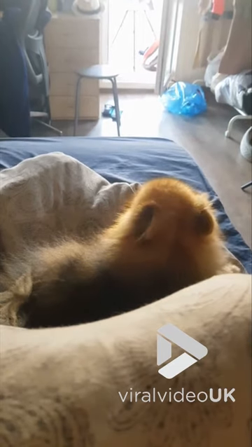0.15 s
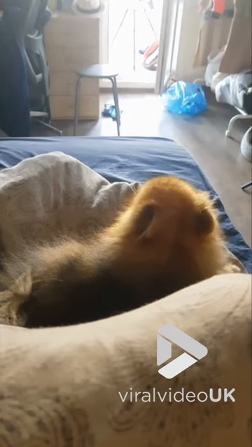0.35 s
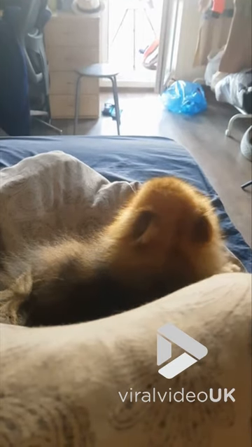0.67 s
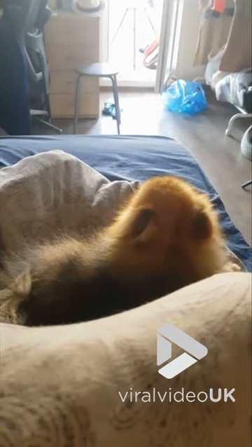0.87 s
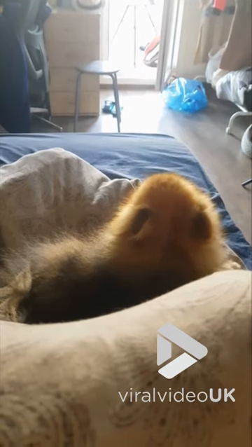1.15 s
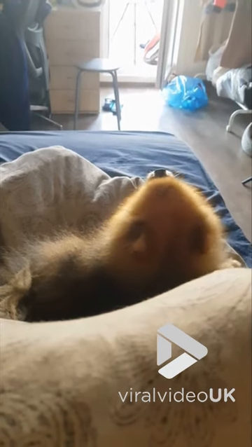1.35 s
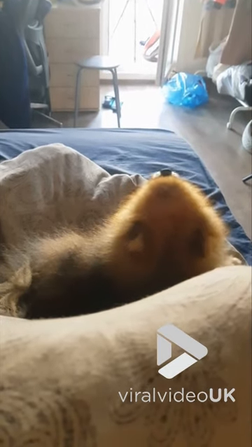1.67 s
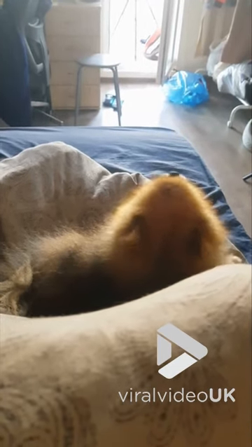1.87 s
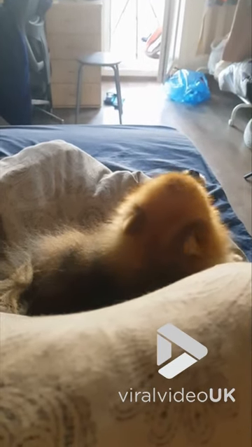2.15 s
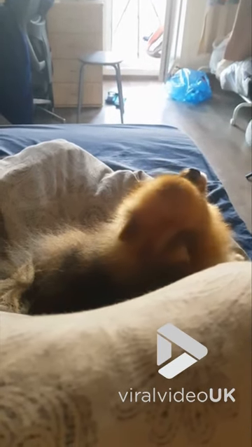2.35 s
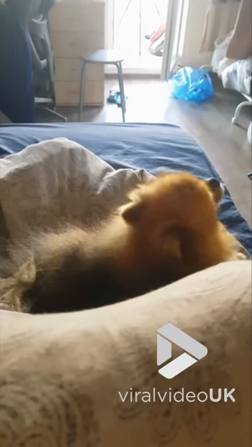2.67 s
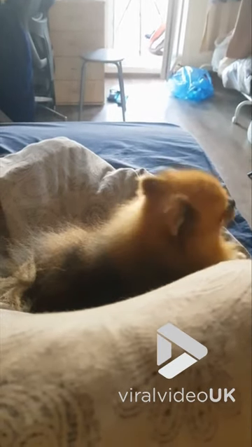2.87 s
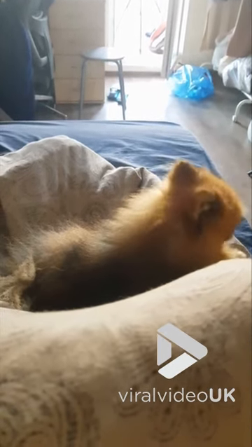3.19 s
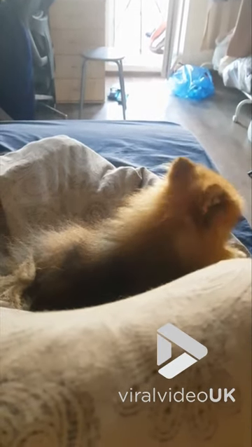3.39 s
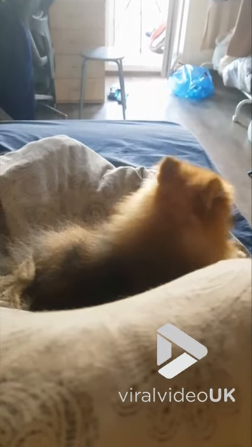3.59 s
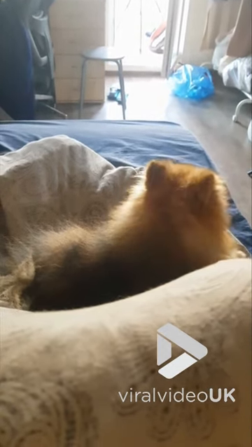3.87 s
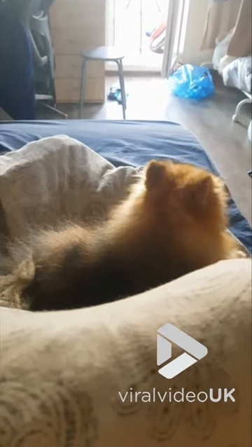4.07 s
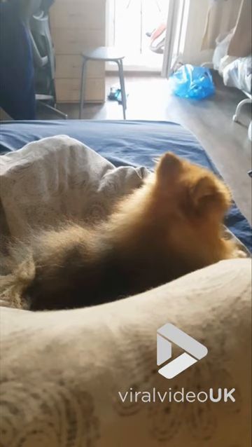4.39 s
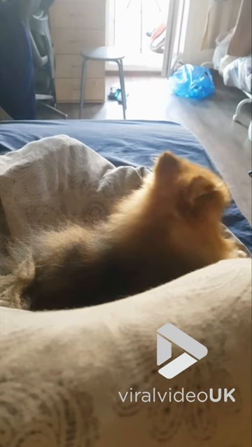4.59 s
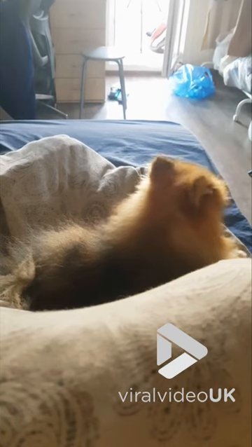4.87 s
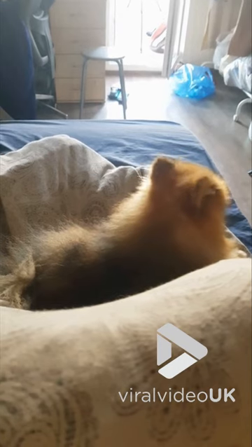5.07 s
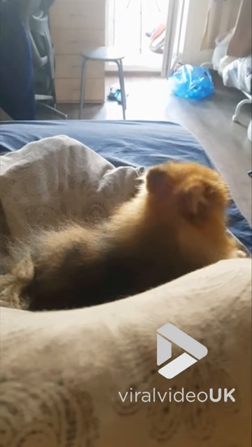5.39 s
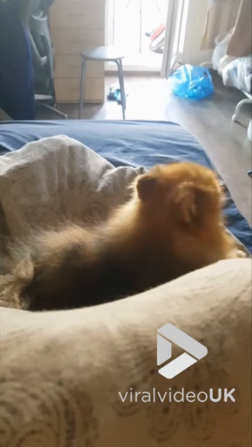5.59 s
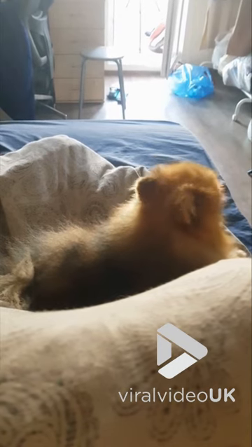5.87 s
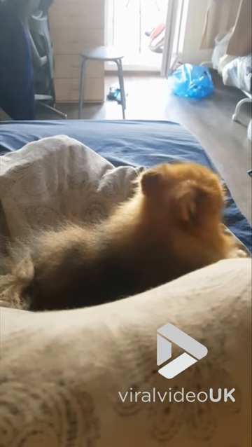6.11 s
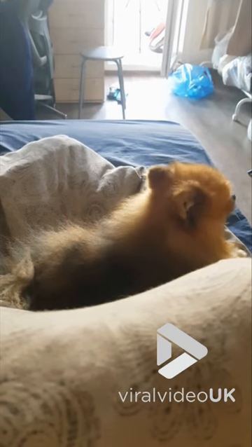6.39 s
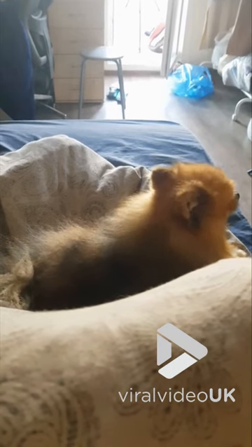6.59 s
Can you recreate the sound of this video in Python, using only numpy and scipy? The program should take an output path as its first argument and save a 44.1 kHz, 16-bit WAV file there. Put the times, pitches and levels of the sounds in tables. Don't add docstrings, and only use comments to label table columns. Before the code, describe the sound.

A small fluffy dog fires off short high yelps, sinks into faint low whines, then wails and yelps again in a quiet room.

```python
import sys
import numpy as np
from scipy import signal
from scipy.fft import rfft, irfft, next_fast_len
from scipy.io import wavfile
from scipy.ndimage import uniform_filter1d, map_coordinates

SR = 44100
rng = np.random.default_rng(int(sys.argv[2]) if len(sys.argv) > 2 else 0)


def waveform_to_disk(signal):
    frames = np.transpose(np.atleast_2d(signal))
    scaled = np.clip(frames, -1, 1) * 32767
    samples = np.round(scaled).astype(np.int16)
    wavfile.write(sys.argv[1], SR, samples)


def gain_from_decibels(decibels):
    exponent = np.asarray(decibels, float) / 20
    return 10 ** exponent


N = 297218

# start in seconds, length in seconds, first pitch in Hz, last pitch in Hz,
# peak level in dB.
YELPS = [
    (0.974, 0.083, 784, 714.3, -30),
    (1.642, .072, 758, 683, -32),
    (5.756, 0.034, 940, 820, -48),
    (6.68, 0.086, 850, 742, -37.5),
]
# peak time as a share of the length, last mouth opening in dB,
# last strain from 0 to 1.
YELP_ENDINGS = [(0.61, -22.5, 0.6), (0.14, -25, 0.4), (.6, -13.5, 1), (0.13, 5.5, 0.7)]
ONSET_S, ONSET_DB, SILENT_DB, FADE_DB = .01, -4.5, -40, -1.5
OPENS_DB = 25

# time in seconds, pitch in Hz, effort in dB,
# mouth opening in dB, strain from 0 to 1.
ROUND = [(.042, 815, -58.5, -34, .05), (.053, 803, -34.5, -28, .05), (.072, 809.5, -26, -17, .05),
         (.088, 796.8, -28, -15.5, .1), (.098, 805, -35.5, -10.5, .2), (.108, 790, -43, -8, .3)]
CLIPPED = [(.271, 925, -63, -39, .05), (.282, 889, -31, -32, .05), (.297, 893.4, -28.5, -23.5, .05),
           (.312, 888, -27.5, -18.5, .1), (.327, 810, -34, -18, 0.38)]
FALLING = [(.495, 855, -51.5, -49, 0.3), (.502, 916.5, -46.5, -40.5, 0.52), (.55, 872, -28, -22, 0.15),
           (.57, 850, -33.5, -18, 0.28), (.585, 787, -31, -16, 0.2), (.6, 750, -35, -21.5, 0.077),
           (0.614, 684.5, -34.5, -21.5, 0.1), (0.638, 676, -37, -25.5, 0.9)]
BRIGHT = [(.784, 889, -62.5, -23, 0.044), (0.793, 873, -32, -17.5, .1), (.808, 883, -30.5, -11, 0.11),
          (0.821, 908, -31.5, -4, .15), (.836, 891, -33, -2, 0.35), (.85, 880, -37.5, -4, .3)]
LEAPING = [(1.195, 799, -39, -37.5, .1), (1.211, 776, -25, -46, 0.15), (1.225, 851, -26.5, -23, .1),
           (1.235, 873.5, -27, -19.5, .25), (1.248, 873, -30.5, -23.5, .25),
           (1.264, 885.5, -30.5, -21, 0.34), (1.281, 833, -34, -32.5, 0.67), (1.3, 750, -33, -33.5, 0.49)]
ARCHED = [(1.421, 781, -54, -38.5, 0.22), (1.431, 742, -30, -39, 0.17), (1.448, 769, -27, -33, .15),
          (1.468, 807.6, -26, -27, 0.31), (1.481, 775, -30, -30.5, 0.2), (1.495, 758, -38, -19.5, .5),
          (1.515, 720, -47.5, -14.5, 1)]
TRAILING = [(1.854, 814, -54, -56.5, 0.16), (1.867, 745.3, -40.5, -34.5, .2), (1.9, 670.5, -31, -33.5, .05),
            (1.937, 651.5, -41.5, -21.5, 0.21), (2.003, 651, -42.5, -12.5, .15),
            (2.035, 607.4, -38, -36, .4), (2.049, 605, -40.5, -38.5, 0.88), (2.079, 609, -45, -49, 0.62)]
BARKED = [(2.206, 666, -68.5, -16, 0.24), (2.213, 674.7, -34, -34.5, 0.22),
          (2.238, 784.4, -27, -19.5, 0.15), (2.254, 771.3, -28.5, -20, 0.19),
          (2.273, 759, -36, -12.5, 0.18), (2.289, 710, -29.5, -34, 0.38), (2.32, 718, -38, -24.5, 0.98)]
CRACKED = [(2.48, 759, -85, -10, 0.26), (2.486, 753, -33.5, -42, 0.083), (2.501, 726, -30.5, -13, 0.16),
           (2.524, 741.6, -30.5, -14, 0.054), (2.548, 683, -31, -19, 0.1), (2.559, 717, -40, -18, 0.92),
           (2.572, 712.4, -37, -26, 0.84), (2.61, 712, -58, -11, 0.59)]
SOFT = [(4.685, 1008, -71, -32, 0.2), (4.7, 929, -55.5, -30.5, 0.22), (4.757, 827, -47.5, -29.5, 0.35),
        (4.797, 791, -45.5, -31, 0.096), (4.853, 780.5, -45, -29, 0.13), (4.894, 876, -49, -24.5, 0.4)]
SHRIEK = [(5.143, 956, -59, -22.5, 0.14), (5.158, 947, -39.5, -7, 0.076),
          (5.175, 1045, -38.5, -12.5, 0.062), (5.19, 1070, -35, -12, .4), (5.205, 1076, -37, -14.5, 0.51),
          (5.222, 1057, -35, -10, 0.75), (5.235, 1044, -41, -16, .6), (5.256, 956, -35.5, -12.5, 0.5)]
WAIL = [(5.251, 998, -30, -23, .2), (5.271, 815.5, -40.5, -28.5, 0.13), (5.3, 808, -35, -32, 0.1),
        (5.33, 800.3, -33, -31, .1), (5.375, 795.5, -37.5, -30.5, .1), (5.417, 796.3, -37.5, -23.5, 0.11),
        (5.447, 738.5, -34, -31.5, .15), (5.465, 712, -40, -26, .3), (5.473, 709, -34, -33, .2),
        (5.485, 693.4, -38.5, -32, 0.4), (5.503, 705, -37, -27, 0.33)]
SWELLING = [(6.066, 835, -54.5, -46, 0.22), (6.09, 811.4, -44, -34.5, 0.52), (6.127, 835.4, -49, -37, .2),
            (6.194, 783.3, -43, -33, 0.066), (6.246, 756.7, -38.5, -14.5, 0.059),
            (6.285, 751, -39, -1, 0.13), (6.299, 732.3, -36.5, -3.5, 0.26), (6.326, 727.5, -42, -7.5, 0.48),
            (6.357, 735, -53.5, 0, 0.4)]
SNAPPED = [(6.5, 811, -64, -13, 0.26), (6.507, 793.4, -46.5, 2, 0.52), (6.522, 808.6, -41, 2, .2),
           (6.534, 808.2, -47, 2.5, .2), (6.541, 806.3, -51, 15.5, .3), (6.557, 809, -50, 14.5, .5)]

# low resonance in Hz, its width in Hz,
# high resonance in Hz, its gain in dB, level of the valleys in dB.
OPEN_MOUTHS = [(3260, 1400, 4850, 11.5, -12), (2650, 500, 4750, 14, -1), (3450, 340, 1100, -18, -3.5),
               (3160, 510, 4700, -9.5, -12), (2940, 350, 17000, -12.5, -25),
               (2880, 570, 5600, -11.5, -20.5), (2454, 2100, 4500, 0, 5.5), (2680, 510, 14000, -21, -12.5),
               (1890, 230, 3090, 2.5, -19.5), (2470, 570, 5440, -11.5, -30.5),
               (2340, 680, 3900, -7.5, -22.5), (2510, 500, 5200, 10, 3), (2800, 630, 4800, -13.5, -2),
               (2400, 970, 3100, -1, -6.5), (2600, 500, 3700, -11, -13.5), (2160, 170, 4420, -12.5, -24.5),
               (2400, 310, 3670, 1.5, -12.5), (2400, 410, 2800, -6, -20)]
HIGH_WIDTH_HZ = 670
# level over the first tone in dB, gain in dB per dB of opening.
SECOND_TONES = [(-5, 0.96), (-3, 0.47), (7.5, 0.87), (5.5, 0.73), (-8.5, 0.27), (5.5, .5), (2, 0.61),
                (-2, 0.6), (-13.5, 0.09), (-5.5, 0.25), (-17, -0.07), (-22.5, -0.49), (1, 0.03),
                (-9.5, 0.08), (-18.5, 0), (-6, 0.06), (3.5, 1.13), (4.5, 1)]
RASPS = [.9, .9, 1.3, .7, 1.2, 1.0, 1.3, 1.3, 1.0, 1.4, 1.2, 1.4, 2.8, .8, .9, 1.3, .9, 1.1]
CROAKS = [-30, -30, -20, -30, -14, -24, -20, -14, 0, 0, 0, -20, -30, -20, -20, -10, -20, -20]
CROAK_DB, CROAK_GROWS_DB = -46, 43
STRAIN_RASP, WHINE_RASP = 5, 1.7
SHIMMER_DB, THROAT_HZ = .42, 250
# frequency in Hz, level in dB.
LIPS = [(2000, -0.5), (6100, -2.5), (7250, -29.5), (8600, -35.5), (11000, -25), (15000, -20.5),
        (16500, -70)]

# time in seconds, pitch in Hz, effort in dB,
# mouth opening in dB, brightness in dB per octave.
GROAN = [(2.735, 460.6, -56, -7.5, 0.5), (2.767, 397.2, -52, 12.5, -13), (2.819, 403, -50.5, 9.5, -10.5),
         (2.861, 309, -51.5, 3, 0), (2.914, 303.6, -51, 5, -0.5), (2.957, 373.6, -52, 0, 7),
         (3.013, 359.3, -53.5, 6.5, -3), (3.045, 313.5, -47.5, -0.5, 7.5), (3.146, 309.9, -67, 7, 14)]
GRUMBLE = [(3.139, 309, -55.5, 1.8, -8), (3.169, 329.9, -58, 3.6, 4), (3.22, 239.7, -55, 5.9, 7),
           (3.324, 209.2, -58, 8.8, -1.5), (3.358, 235.4, -53.5, 3, 2.5), (3.421, 215.4, -63, 11.7, -1),
           (3.528, 165.4, -64.5, 5.1, 2)]
PLEA = [(3.827, 508, -59.5, -7, -2), (3.846, 353.4, -58.5, 0, -8), (4.0, 324.9, -53.5, -5, -0.5),
        (4.062, 440, -58.5, -9, -8), (4.155, 376.3, -53, -9.5, 2.5), (4.193, 396.2, -51, -7.5, -6),
        (4.242, 465, -55.5, -10, 3), (4.272, 648, -51.5, -16.5, 0), (4.331, 681, -53, -12, -8)]
# frequency in Hz, level in dB.
SHUT_MOUTH = [(700, 10.5), (1100, 2), (1550, -5), (1850, -22), (2350, -50.5), (2900, -47.5), (4600, -58.5),
              (5500, -50.5)]

# start in seconds, end in seconds, centre in Hz, width in Hz,
# level in dB.
PUFFS = [(2.798, 2.976, 2620, 500, -78.5), (3.185, 3.423, 2314, 434, -71.5), (3.187, 3.28, 4770, 700, -72),
         (4.723, 4.878, 7130, 1500, -66.5), (5.161, 5.284, 8060, 1234, -62),
         (6.183, 6.32, 9100, 913, -70.5), (.5, .53, 1050, 250, -60), (0.562, .64, 3600, 2400, -61),
         (0.792, 0.856, 1146, 304, -59.5), (1.208, 1.251, 1085, 221, -48), (1.216, 1.286, 2900, 888, -57.5),
         (1.457, 1.51, 1300, 504, -56), (2.215, 2.27, 1050, 300, -53), (2.538, 2.608, 3900, 2400, -55),
         (5.153, 5.271, 4280, 2600, -59), (5.77, 5.82, 2530, 60.4, -69.5), (6.286, 6.336, 1140, 400, -64.5),
         (6.498, 6.563, 1040, 400, -55.5), (6.69, 6.75, 1070, 350, -60.5)]

# time in seconds, left minus right in dB.
FACING = [(.1, -5.5), (.3, -1), (0.551, 0.5), (.82, 2), (1.02, -0.5), (1.25, -1), (1.459, 0), (1.679, 1.5),
          (1.95, 2), (2.25, 0), (2.52, 0), (3.1, 0), (4.1, -1), (4.8, 0), (5.3, 0), (6.2, -0.5),
          (6.53, -3.5), (6.72, -3.5)]
# frequency in Hz, direct sound in dB.
HEAD_SHADOW = [(300, 2), (1000, 3.5), (2500, -2.5), (6000, -13.5)]
# frequency in Hz, left minus right in dB.
VOICE_SIDES = [(60, -7.5), (250, -1.5), (620, -2), (720, 1), (830, -4.5), (1650, 3), (4970, -6.5),
               (15000, 15.5)]

# frequency in Hz, time to fall 60 dB in seconds.
ROOM_DECAY = [(300, 0.34), (1000, 0.3), (3000, 0.29), (7000, 0.34)]
# frequency in Hz, echo level in dB.
ROOM_COLOUR = [(150, -8), (500, -4.5), (1500, 3), (5000, -6)]
# frequency in Hz, left level in dB, right level in dB.
ROOM_TONES = [(541, 4, -2.5), (667, -2, -20.5), (671, 6, 0.5), (775, -25, -12.5), (783, -22, -17),
              (815, -26.5, -14.5), (887, -23.5, -11.5), (902, -18, -6), (1050, -20.5, -13),
              (1520, -15, -12.5), (1616, -12.5, -10.5), (1637, -8, -3), (1830, -9, -8.5),
              (1920, -21.5, -23.5)]

# time in seconds, level in dB.
RUMBLE = [(0.0, -79.5), (0.191, -60), (0.22, -73), (0.81, -74.5), (0.842, -66), (1.032, -73.5),
          (2.289, -71), (2.89, -64), (3.45, -70), (3.59, -62.5), (3.64, -76), (4.43, -71), (4.5, -64.5),
          (4.58, -76), (5.031, -75), (5.09, -60), (5.18, -66), (6.74, -68)]
# frequency in Hz, density in dB per Hz.
RUMBLE_COLOUR = [(12, -38.5), (20, -2), (49, 9.5), (151, -4.5), (170, -13.5), (220, -50), (370, -120)]
# frequency in Hz, density in dB per Hz.
AIR_COLOUR = [(100, -40.5), (170, -5.5), (305, -10.5), (383, -9.5), (462, -7), (1210, -13.5), (1430, -19.5),
              (1980, -8.5), (2620, -24), (4620, -23.5), (8140, -31), (10400, -17.5), (15500, -15.5)]
AIR_DB = -69
# frequency in Hz, left-right correlation.
AIR_ALIKE = [(60, .9), (200, .9), (600, .45), (1600, .1), (5000, .3), (9000, .66), (13000, .9)]
# frequency in Hz, left minus right in dB.
AIR_SIDES = [(30, -9), (80, -5.5), (200, -2), (700, -1), (2200, 5), (4500, -1), (9000, 4), (14000, .3)]


def dog():
    clear = filtered(clear_calls(), lambda hz: 1 / (1 + (THROAT_HZ / (hz + 1)) ** 10))
    return clear + whines()


def clear_calls():
    out = np.zeros(N)
    bent = [ROUND, CLIPPED, BRIGHT, FALLING, LEAPING, ARCHED, TRAILING, BARKED, CRACKED,
            SOFT, SHRIEK, WAIL, SWELLING, SNAPPED]
    calls = [*map(yelp, YELPS, YELP_ENDINGS), *map(np.array, bent)]
    calls.sort(key=lambda rows: rows[0, 0])
    for rows, shape, second, rasp, croak_db in zip(calls, OPEN_MOUTHS, SECOND_TONES, RASPS, CROAKS):
        s, pitch, db, open_db, strain = rows.T
        low_hz, width_hz, high_hz, high_db, valley_db = shape
        second_db, follows = second

        def mouth(hz, t):
            low = bell(hz, low_hz, width_hz)
            high = gain_from_decibels(high_db) * bell(hz, high_hz, HIGH_WIDTH_HZ)
            return gain_from_decibels(along(LIPS, hz)) * (low + high + gain_from_decibels(valley_db))

        scatter = rasp + STRAIN_RASP * strain ** 2
        second_level = db + second_db + follows * open_db
        croak_level = db + croak_db + CROAK_DB + CROAK_GROWS_DB * strain
        controls = [s, pitch, scatter, db, second_level, db + open_db, croak_level]
        start, voice = call(controls, mouth, count=2, shimmer_db=SHIMMER_DB * scatter,
                            breath_db=-19, croaks=True, glide=200)
        out[start:start + len(voice)] += voice
    return out


def yelp(row, ending):
    start, length, first_hz, last_hz, db = row
    peak, open_db, strain = ending
    onset = ONSET_S / length
    gone = np.array([0, onset, max(peak, onset + .01), 1])
    pitch = first_hz + (last_hz - first_hz) * gone
    effort_db = db + np.array([SILENT_DB, ONSET_DB, 0, FADE_DB])
    opening_db = open_db - OPENS_DB * (1 - gone) ** 2
    return np.transpose([start + length * gone, pitch, effort_db, opening_db, strain * gone ** 2])


def whines():
    out = np.zeros(N)
    for rows in GROAN, GRUMBLE, PLEA:
        s, pitch, db, open_db, tilt_db = np.transpose(rows)

        def mouth(hz, t):
            return gain_from_decibels(along(SHUT_MOUTH, hz) + np.interp(t, s, tilt_db) * np.log2(hz / 700))

        controls = [s, pitch, np.full(len(s), WHINE_RASP), db, db + open_db]
        start, voice = call(controls, mouth, count=1, shimmer_db=1.3, breath_db=-20, croaks=False, glide=1100)
        out[start:start + len(voice)] += voice
    return out


def call(controls, mouth, count, shimmer_db, breath_db, croaks, glide):
    s, *cols = controls
    start = round(s[0] * SR)
    t = np.arange(start, min(N, round(s[-1] * SR))) / SR
    hz, hoarse = [np.interp(t, s, c) for c in cols[:2]]
    hz = uniform_filter1d(hz, size=glide, mode='nearest')
    levels = [np.interp(t, s, gain_from_decibels(db / 2)) ** 2 for db in cols[2:]]

    uneven = wobble(320, len(t))
    uneven -= uniform_filter1d(uneven, size=900)
    turns = np.cumsum(hz * (1 + hoarse / 105 * uneven)) / SR

    k = np.arange(1, 20)[:, None]
    upper = mouth(k[count:] * hz, t)
    upper *= levels[count] / np.sqrt(np.sum(upper ** 2, 0))
    flutter = np.array([wobble(150, len(t)) for _ in k]) * np.sqrt(k)
    shimmer = gain_from_decibels(np.interp(t, s, shimmer_db + 0 * s) * flutter)
    tones = np.vstack([levels[:count], upper]) * shimmer * np.sin(2 * np.pi * k * turns - 2.4 * k)

    breath = gain_from_decibels(breath_db) * hoarse * wobble(600, len(t))
    voice = tones.sum(0) + breath * tones[count:].sum(0)
    if croaks:
        half = 2 * np.pi * (turns / 2 + 0.7 * wobble(70, len(t)))
        voice += levels[-1] * (np.sin(half) + .8 * np.sin(3 * half) + 0.23 * np.sin(5 * half))
    edge = np.clip(np.minimum((t - t[0]) / .004, (t[-1] - t) / .014), 0, 1)
    return start, np.sqrt(2) * voice * edge


def puffs():
    t = np.arange(N) / SR
    out = np.zeros(N)
    for start, end, centre_hz, width_hz, db in PUFFS:
        hiss = filtered(rng.standard_normal(N), lambda hz: bell(hz, centre_hz, width_hz))
        gone = np.clip((t - start) / (end - start), 0, 1)
        swell = np.sqrt(np.clip(np.sin(np.pi * gone), 0, 1))
        out += gain_from_decibels(db) * swell * hiss / np.std(hiss)
    return out


def direct(voice):
    facing_db = np.interp(np.arange(N) / SR, *np.transpose(FACING))
    facing = gain_from_decibels(facing_db * [[.5], [-.5]])
    return filtered(voice, lambda hz: gain_from_decibels(along(HEAD_SHADOW, hz)) * leaning(VOICE_SIDES, hz)) * facing


def room(voice):
    hz, t, z = signal.stft(rng.standard_normal((3, SR // 2)), SR, nperseg=256)
    decay = gain_from_decibels(-60 * t / along(ROOM_DECAY, hz)[:, None])
    shared, *own = signal.istft(z * decay, SR, nperseg=256)[1]
    tail = 0.54 * shared + np.array(own)
    tail = tail / np.linalg.norm(tail[0])
    t = np.arange(tail.shape[1]) / SR
    for tone_hz, left_db, right_db in ROOM_TONES:
        ring = gain_from_decibels(-60 * t / 0.35) * np.sin(2 * np.pi * tone_hz * t)
        tail += gain_from_decibels([[left_db - 58], [right_db - 51.0]]) * ring
    sent = filtered(voice, lambda hz: gain_from_decibels(along(ROOM_COLOUR, hz)))
    late = np.pad(sent, (150, 0))
    return signal.fftconvolve(late[None], tail, axes=1)[:, :N]


def air():
    swells_db = np.interp(np.arange(N) / SR, *np.transpose(RUMBLE))
    rumble = gain_from_decibels(swells_db + 4.0 * wobble(12, N) + 0.5) * rush(RUMBLE_COLOUR)
    return rumble + gain_from_decibels(AIR_DB + 0.18 * wobble(6.3, N)) * rush(AIR_COLOUR)


def rush(colour):
    def response(hz):
        turn = np.arccos(np.clip(along(AIR_ALIKE, hz), -1, 1)) / 2
        return gain_from_decibels(along(colour, hz)) * [np.cos(turn), np.sin(turn)]

    mid, side = filtered(rng.standard_normal((2, N)), response)
    pair = filtered(np.array([mid + side, mid - side]), lambda hz: leaning(AIR_SIDES, hz))
    return pair / np.std(pair)


def along(points, hz):
    f, v = np.transpose(points)
    return np.interp(np.log(hz + 1), np.log(f + 1), v)


def bell(hz, centre, width):
    return np.exp(-2 * ((hz - centre) / width) ** 2)


def wobble(rate, count):
    knots = rng.standard_normal(int(count * rate / SR) + 4)
    return map_coordinates(knots, [np.arange(count) * rate / SR])


def filtered(x, response):
    m = next_fast_len(N + 8192)
    return irfft(rfft(x, m) * response(np.fft.rfftfreq(m, 1 / SR)), m)[..., :N]


def leaning(sides, hz):
    return gain_from_decibels(along(sides, hz) * [[.5], [-.5]])


def scene():
    voice = dog() + puffs()
    return direct(voice) + room(voice) + air()


def thinned(x):
    hz, _, z = signal.stft(x, SR, nperseg=1024)
    power = uniform_filter1d(np.mean(np.abs(z) ** 2, 0), size=5, axis=0)
    below_db = 10 * np.log10(power.max(0) / power)
    chance = uniform_filter1d(rng.standard_normal(power.shape), size=5, axis=0)
    chance = uniform_filter1d(chance, size=7, axis=1)
    fragile = (np.abs(hz - 11850) < 110) | (np.abs(hz - 7600) < 1300)
    limit = 3.3 - below_db / 21 - 1.1 * fragile[:, None]
    lost = (chance / chance.std() > limit) & (hz > 2200)[:, None]
    return signal.istft(np.where(lost, .08 * z, z), SR, nperseg=1024)[1][:, :N]


def roll_off(x):
    return signal.sosfilt(signal.butter(12, 15610, fs=SR, output="sos"), x)


def record(dry):
    mix = thinned(dry)
    return roll_off(mix)


dry = scene()
out = record(dry)
waveform_to_disk(out)
```